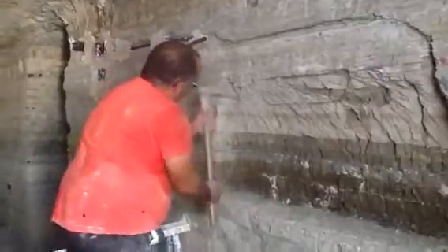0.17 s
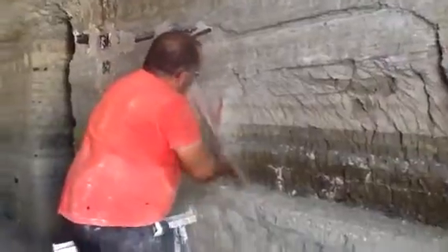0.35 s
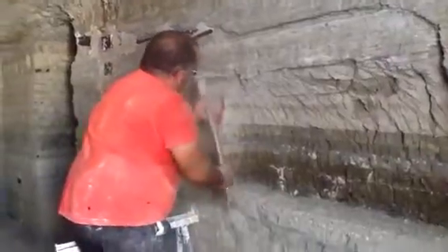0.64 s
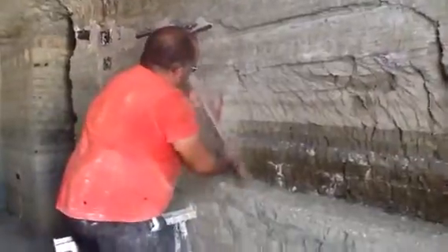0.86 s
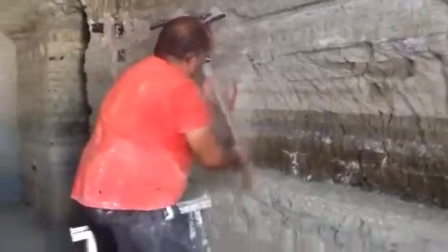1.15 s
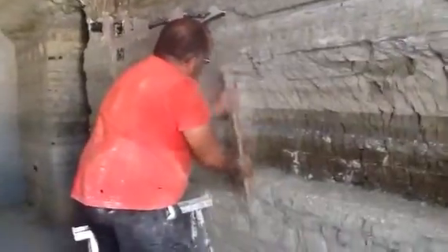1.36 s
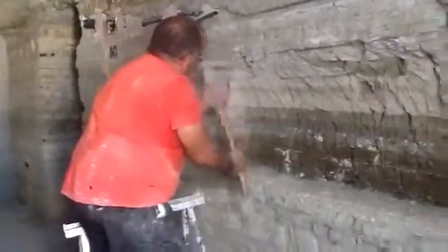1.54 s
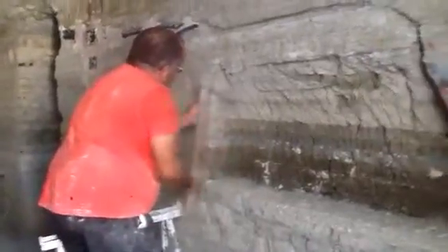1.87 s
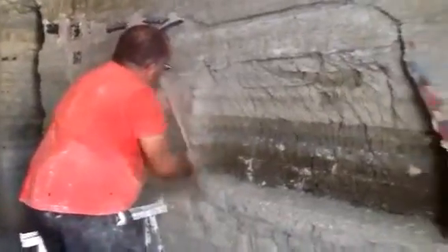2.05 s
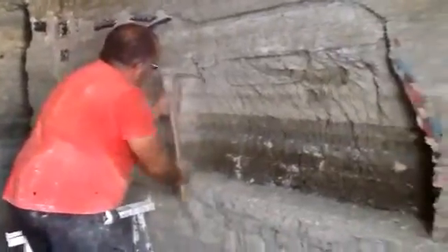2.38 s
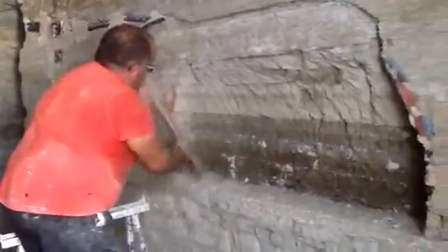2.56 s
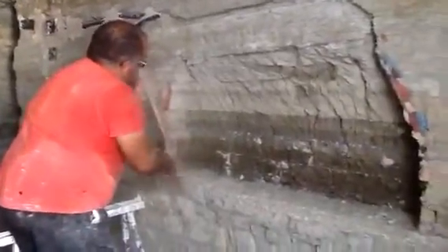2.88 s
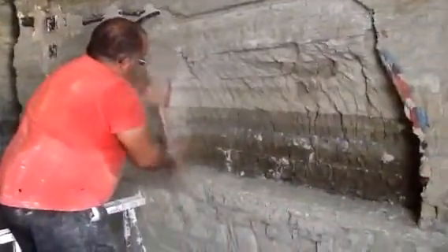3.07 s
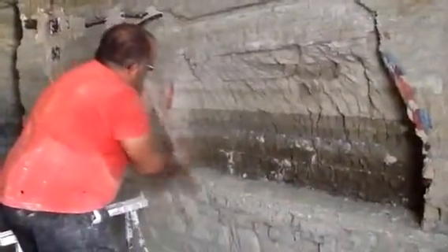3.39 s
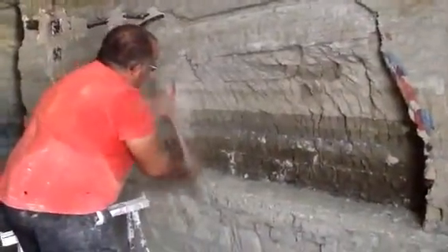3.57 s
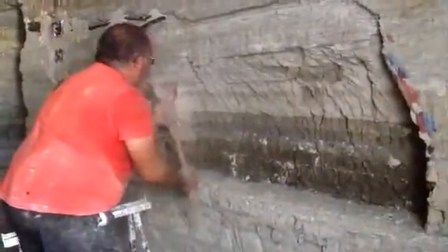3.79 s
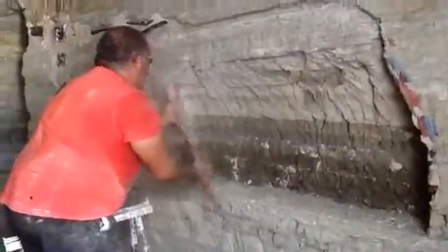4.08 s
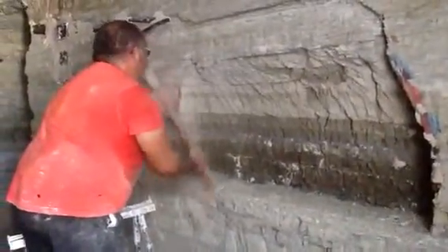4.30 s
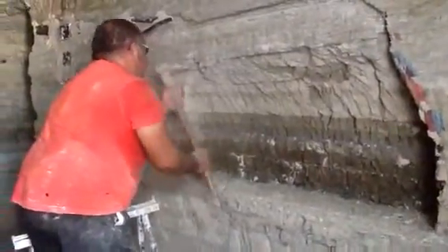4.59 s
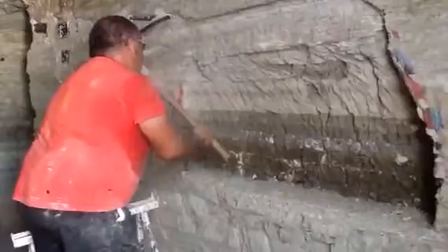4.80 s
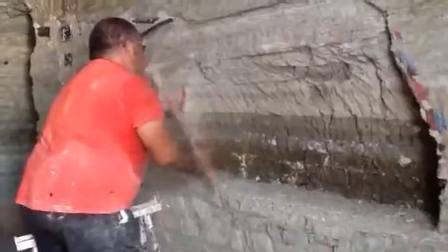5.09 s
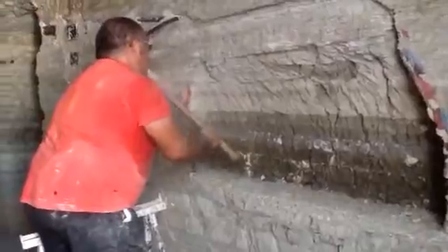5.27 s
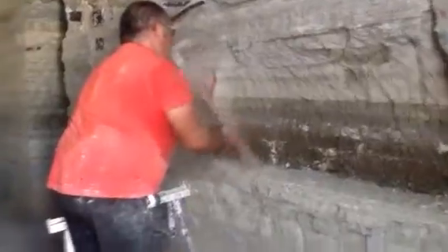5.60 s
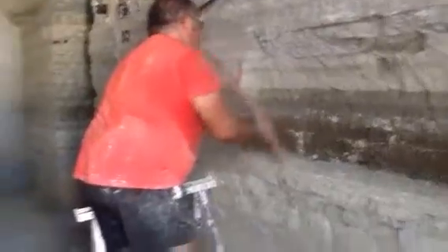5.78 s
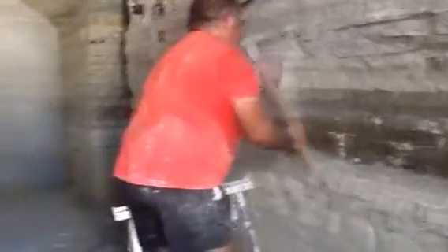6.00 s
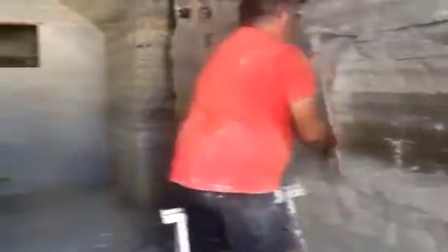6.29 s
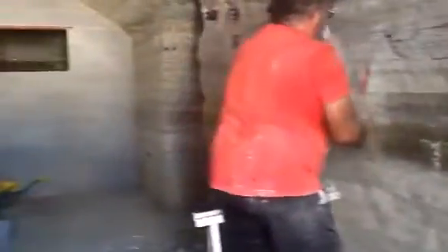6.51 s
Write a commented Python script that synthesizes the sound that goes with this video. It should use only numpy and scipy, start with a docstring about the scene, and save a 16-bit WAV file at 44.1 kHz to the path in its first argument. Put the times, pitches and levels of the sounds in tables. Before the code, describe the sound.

A brief rattle of stone opens, and a hand pick starts biting into a soft rock wall, a little over twice a second, continuing to the end at about 6.5 seconds. Each blow is a short, gritty crunch with a knock and a dull thud. Small chips clink and grit ticks between the blows. At about 1.9 seconds rubble slides along a steel blade, which rings out with a sharp, bright snap; a second ringing scrape follows near 2.9 seconds. A faint low rumble comes and goes behind the work, then swells from about 4.3 to 5.4 seconds as something heavy tumbles and makes the cave hum, along with more sliding rubble. Brighter clinks stand out near 5.1 and 5.9 seconds. Dust trickles as a quiet hiss throughout. The cave is small, with a short, dense echo, heard through a small microphone with little deep bass.

```python
"""A brief rattle of stone, then a hand pick biting into soft rock about twice a second in a small cave.
Each bite crushes the rock until it splits. Loosened chips clink, grit snaps and rubble slides, twice
along a steel blade that rings out. Behind the work dust trickles, and something heavy tumbles and wakes
the low modes of the cave. A small microphone with a bass cut hears the work with a short, dense echo."""
import sys
import numpy as np
from scipy import signal
from scipy.fft import rfft, irfft
from scipy.io import wavfile
from scipy.ndimage import uniform_filter1d

SR = 44100
rng = np.random.default_rng(int(sys.argv[2]) if len(sys.argv) > 2 else 0)


def generate_wav(signal):
    """Clip the signal to [-1, 1] and save it as 16-bit WAV at the path in sys.argv[1]."""
    frames = np.transpose(np.atleast_2d(signal))
    scaled = np.clip(frames, -1, 1) * 32767
    pcm = np.round(scaled).astype(np.int16)
    wavfile.write(sys.argv[1], SR, pcm)


N = 293265


def amp(db):
    return 10 ** (np.asarray(db) / 20)


def unit_rms(x):
    return x / np.sqrt(np.mean(x ** 2) + 1e-20)


def curve_at(points, hz):
    """Looks a value up on a log-frequency axis."""
    point_hz, value = np.transpose(points)
    return np.interp(np.log(hz + 1), np.log(point_hz + 1), value)


def add(mix, start_s, sound):
    part = mix[round(start_s * SR):][:len(sound)]
    part += sound[:len(part)]


def colour(x, spectrum, lo_hz=0, hi_hz=SR):
    """Shapes x by a spectrum normalised to its 800-3500 Hz power, then keeps one band."""
    hz = np.fft.rfftfreq(len(x), 1 / SR)
    gain = amp(curve_at(spectrum, hz))
    gain /= np.sqrt(np.mean(gain ** 2 * (hz > 800) * (hz < 3500)))
    band = 1 / (1 + (lo_hz / (hz + 1)) ** 6) / (1 + (hz / hi_hz) ** 6)
    return irfft(rfft(x) * gain * np.sqrt(band), len(x))


def ring(x, modes, chance_db=0):
    """Resonances (pitch_hz, width_hz, level_db), each driven harder or softer by chance."""
    out = np.zeros(len(x))
    for hz, width_hz, db in modes:
        radius = np.exp(-np.pi * width_hz / SR)
        pole = radius * np.exp(2j * np.pi * hz / SR)
        gain = amp(db + chance_db * rng.standard_normal())
        out += gain * signal.lfilter([np.sqrt(1 - radius)], [1, -pole], x).real
    return out


def grit(count, grain_db, grain_samples):
    """Noise in short grains of uneven strength."""
    strength = unit_rms(uniform_filter1d(rng.standard_normal(count), grain_samples))
    return unit_rms(rng.standard_normal(count) * amp(grain_db * strength))


# Spectrum of the dust on the wall, far in the background: freq_hz, level_db
DUST_SPECTRUM = [(30, -38), (75, -6), (108, -16), (152, 11.5), (362, 1.5), (611, -4.5), (2090, 3.5),
                 (3720, -6), (4840, 2), (7170, -5), (13500, -8), (15700, -15)]


def trickle(level_db=-59):
    """A quiet hiss that swells as dust and crumbs run down the wall."""
    swell_db = 3 * unit_rms(uniform_filter1d(rng.standard_normal(N), 3000))
    return amp(level_db + swell_db) * unit_rms(colour(grit(N, 1.5, 60), DUST_SPECTRUM))


# Spectrum of heavy pieces rolling: freq_hz, level_db
HEAVY_SPECTRUM = [(24, -65), (40, -39), (80, -26), (116, -61), (141, 15), (324, 13), (355, 11.5), (551, -2),
                  (622, 3), (1500, -12.5), (1950, -57)]
# Low modes of the cave around the microphone: pitch_hz, width_hz, level_db
CAVE_MODES = [(174.5, 2.4, 2.5), (194.6, 1.1, 7.5), (246.7, 4.6, 5.5), (294.1, 1.7, 4.5), (362.8, 4.2, 5.5),
              (457, 3.4, -10)]
# Heavy pieces tumbling behind the work: peak_s, swell_s, t60_s, rumble_db, lowest_modes_db
TUMBLES = [(0.0, 0.05, 0.38, -41, -75), (0.88, 0.076, 1.9, -44, -51.5), (1.43, 0.2, 1.05, -43, -49.5),
           (2.04, 0.12, 1.35, -50.5, -56.5), (2.77, 0.03, 0.77, -51, -61), (3.0, 0.11, 3.7, -66.5, -70),
           (3.203, 0.3, 0.83, -36.5, -38.5), (3.75, 0.66, 2.6, -53, -49.5), (4.27, 0.096, 0.37, -26.5, -42),
           (4.55, 0.093, 0.76, -23.5, -23.5), (4.63, 0.078, 0.86, -20.5, -33),
           (4.69, 0.043, 0.76, -30, -40), (4.779, 0.076, 0.17, -41, -27.5), (5.001, 0.17, 2.1, -29, -31.5),
           (5.13, 0.12, 0.77, -26.5, -33), (5.22, 0.031, 0.48, -30, -34), (5.3, 0.079, 0.93, -38, -32),
           (6.37, 0.038, 0.84, -45.5, -56.5)]


def rumble(lowest_hz=(135.5, 149.5), rest_db=(-74, -69.5)):
    """Tumbling pieces wake the modes of the cave; the two lowest beat against each other."""
    t = np.arange(N) / SR
    power = amp(rest_db)[:, None] ** 2  # one row for the rumble, one for the lowest modes
    for peak_s, swell_s, t60_s, *levels_db in TUMBLES:
        shape_db = np.where(t < peak_s, -28.5 * (peak_s - t) / swell_s, -60 * (t - peak_s) / t60_s)
        power = power + (amp(levels_db)[:, None] * amp(shape_db)) ** 2
    noise = grit(N, grain_db=1, grain_samples=400)
    boom = unit_rms(ring(noise, CAVE_MODES))
    roll = amp(-3) * unit_rms(colour(noise, HEAVY_SPECTRUM, 150, 1500))
    beating = sum(0.13 * unit_rms(ring(noise, [(hz, 7, 0)]))
                  + np.sin(2 * np.pi * (hz * t + rng.random())) for hz in lowest_hz)
    return (np.sqrt(power) * [unit_rms(boom + roll), unit_rms(beating)]).sum(0)


# Decay of the echo between the close walls: freq_hz, t60_s
ECHO_DECAY = [(150, 0.4), (500, 0.29), (2000, 0.32), (6000, 0.22), (14000, 0.35)]


def cave_echo(x):
    """Dense reflections of random sign, one in every 20 samples, each band dying at its own speed."""
    taps = np.zeros(SR // 2)
    slots = np.arange(200, len(taps) - 20, 20)
    taps[slots + rng.integers(0, 20, len(slots))] = rng.choice([-1., 1.], len(slots))
    hz, t, bands = signal.stft(taps, SR, nperseg=256)
    decay = amp(-60 * t / curve_at(ECHO_DECAY, hz)[:, None])
    tail = signal.istft(bands * decay, SR, nperseg=256)[1]
    return signal.fftconvolve(x, tail / np.linalg.norm(tail))[:N]


def crumbs(count):
    """Faint chips and ticks fall at random times around the work."""
    out = np.zeros(N)
    for chip_at, tick_at, size, pitch in rng.random((count, 4)):
        add(out, chip_at * N / SR, clink(-57 + 11 * size ** 2, 1700 * 3.5 ** pitch, .9, 200))
        add(out, tick_at * N / SR, tick(-52 + 10 * size, 4000 * 3 ** pitch))
    return out


# Grit snapping, high and dry: start_s, peak_db, pitch_hz
GRIT_TICKS = [(0.066, -34, 8300), (0.106, -35, 6000), (1.4336, -33, 5040), (1.4983, -33, 7260),
              (1.565, -40, 6850), (1.7776, -35.5, 8800), (1.91, -22, 9000), (1.936, -10, 10200),
              (2.192, -23.5, 8200), (2.5172, -41.5, 6200), (2.6374, -40, 6100), (2.883, -26, 5500),
              (3.451, -39.5, 6000), (4.464, -37, 6000), (4.6319, -25.5, 5200), (5.097, -41, 6000),
              (5.382, -43, 7000), (5.3183, -44, 8000), (5.024, -38, 9000), (6.1035, -50, 6550),
              (6.567, -46, 3500)]


def tick(peak_db, pitch_hz):
    """A grain snaps: a few milliseconds of bright noise around one broad resonance."""
    t = np.arange(SR // 20) / SR
    snap = rng.standard_normal(len(t)) * amp(-60 * t / .025) * (1 - np.exp(-t / .0007))
    snap = colour(snap, [(1500, -30), (0.61 * pitch_hz, -8), (pitch_hz, 0), (2.6 * pitch_hz, -12)])
    return amp(peak_db) * snap / abs(snap).max()


# Spectrum of loose stone on the cave floor: freq_hz, level_db
RUBBLE_SPECTRUM = [(180, -10), (300, -2), (454, -6.5), (1020, 1.5), (1230, -1), (1420, -3), (1800, -1),
                   (2160, -2), (3720, -21), (4540, -18.5), (12100, -22.5), (15700, -32)]
# Modes of the steel blade under the rubble: pitch_hz, width_hz, level_db
BLADE_MODES = [(1245, 45, 0), (1545, 30, -4), (1780, 60, -4), (2165, 50, 0), (2546, 60, -7), (4610, 70, -8),
               (5550, 50, -10), (6050, 45, -11), (6471, 37, -5), (9600, 100, -11), (11090, 60, -10)]
# Rubble sliding: start_s, swell_s, hold_s, level_db, fade_db_per_s, hiss_db, steel_db (both re level)
SLIDES = [(0.0, 0.0024, 0.036, -48, 119, -2.5, -2), (0.047, 0.022, 0.036, -43.5, 155, -0.5, -17),
          (1.809, 0.0068, 0.031, -49.5, 201, 10.5, 9.5), (1.838, 0.083, 0.027, -33.5, 109.5, 6.5, 7),
          (2.835, 0.071, 0.016, -40.5, 141, 8.5, 7), (2.956, 0.03, 0.03, -43.5, 175, 3, 3.5),
          (3.5, 0.065, 0.0055, -52.5, 75, 5.5, -40), (3.835, 0.0064, 0.01, -50.5, 60, 10, -57),
          (3.991, 0.021, 0.0058, -47, 202, 3.5, -40.5), (4.45, 0.063, 0.13, -36.5, 141, -10.5, -40),
          (4.94, 0.21, 0.025, -46, 111, -59, -34)]


def slide(swell_s, hold_s, level_db, fade_db_per_s, hiss_db, steel_db):
    """Gravel rushes along and keeps the steel ringing; the stones clink at scattered high pitches."""
    t = np.arange(0, swell_s + hold_s + 26.5 / fade_db_per_s, 1 / SR)  # ends 26.5 dB down
    fading_s = np.maximum(t - swell_s - hold_s, 0)
    envelope_db = level_db - 10 * np.maximum(1 - t / swell_s, 0) - fade_db_per_s * fading_s
    noise = grit(len(t), grain_db=3.5, grain_samples=90)
    # larger pieces wake now one mode of the blade, now another
    steel = unit_rms(sum(ring(grit(len(t), 4, 700), [mode], chance_db=1) for mode in BLADE_MODES))
    clink_hz = 4200 * 3 ** rng.random(18) ** 1.5
    clinks = sum(ring(grit(len(t), 6, 500), [(hz, 100, 0)]) for hz in clink_hz)
    body = colour(noise, RUBBLE_SPECTRUM, hi_hz=3700)
    hiss = unit_rms(colour(noise, RUBBLE_SPECTRUM, lo_hz=3700)) + .6 * unit_rms(clinks)
    hiss = unit_rms(colour(hiss, [(4000, 0), (15000, 0.2 * hiss_db)]))  # heavier rubble is duller
    hiss *= amp(hiss_db - 24 * fading_s)  # fades faster than the body
    return amp(envelope_db) * (body + amp(steel_db) * steel + hiss) * signal.windows.tukey(len(t), .08)


# Short ringing clinks: stone chips landing, and the steel blade ringing out during the two scrapes:
# start_s, level_db, pitch_hz, clack_share, roughness_hz
CLINKS = [(0.047, -30.5, 1860, 0.9, 400), (0.3554, -36, 3040, 0.3, 270), (0.356, -34.5, 7440, 0.5, 38),
          (0.486, -30, 3480, 0.56, 30), (0.722, -47, 2560, 0.1, 60), (0.81, -41, 980, 0.85, 310),
          (0.835, -29, 4830, 0.59, 320), (0.879, -41, 11100, 0.6, 35), (0.929, -33, 2100, 0.7, 200),
          (1.355, -39, 1980, 0.95, 300), (1.599, -38.5, 2690, 0.73, 240), (1.813, -32, 2130, 0.06, 410),
          (1.908, -18, 1250, 0.4, 40), (1.924, -23, 2150, 1, 36), (2.082, -27.5, 819, 0.44, 19),
          (2.074, -20.5, 1266, 0.17, 35), (2.19, -24, 3452, 0.34, 21), (2.583, -38.5, 1574, 0.28, 110),
          (2.598, -34, 1530, 0.14, 23), (2.853, -22, 1173, 0.1, 66), (2.9, -21, 1558, 0.28, 29),
          (3.416, -40.5, 1660, 0.86, 350), (3.4935, -37.5, 3480, 0.4, 14), (3.495, -30.5, 916, 0.8, 390),
          (3.557, -30, 2370, 0.6, 250), (3.807, -33.5, 860, 0.98, 380), (4.002, -32, 3350, 0.3, 53),
          (4.012, -29, 2670, 0, 90), (4.441, -35.5, 1050, 0.94, 290), (5.129, -22.5, 1247, 0.06, 370),
          (5.232, -41, 8800, 0.4, 200), (5.252, -34, 6360, 0.66, 300), (5.325, -34.5, 2270, 0.64, 120),
          (5.325, -38, 5400, 0.7, 150), (5.6979, -42.5, 3490, 0.47, 11), (5.948, -22.5, 4730, 0.57, 260),
          (6.137, -43, 2310, 0.45, 300), (6.193, -32, 11500, 0.26, 500), (6.281, -46, 1670, 0.9, 320)]


def clink(level_db, pitch_hz, clack_share, roughness_hz):
    """A tap on stone or steel: a clack of short rings around one longer tone, clear or roughened."""
    t = np.arange(SR // 3) / SR
    tap = rng.standard_normal(len(t)) * amp(-60 * t / 0.15) * (1 - np.exp(-t / .002))
    clack_hz = np.clip(pitch_hz * np.exp(0.247 * rng.standard_normal(9)), 300, 15000)
    clack = ring(tap, [(hz, 90 + .03 * hz, 0) for hz in clack_hz], chance_db=3)
    clack += 0.19 * colour(tap, RUBBLE_SPECTRUM, lo_hz=1800)
    blur_hz = pitch_hz + 90 + roughness_hz * rng.uniform(-1, 1, (4, 1))  # close partials blur the tone
    blur = min(.12 + roughness_hz / 300, .8) * np.sin(2 * np.pi * blur_hz * t).sum(0)
    tone = np.sin(2 * np.pi * pitch_hz * t) + blur
    t60_s = 0.11 + 4 / roughness_hz  # a clear tone lasts longer
    tone = tone / abs(tone[:900]).max() * amp(-60 * t / t60_s) * (1 - np.exp(-t / 0.0026))
    return amp(level_db) * ((1 - clack_share) * tone + clack_share * clack / abs(clack).max())


# Spectrum of soft rock being crushed: freq_hz, level_db
ROCK_SPECTRUM = [(100, 25), (404, 2.5), (885, -4), (1740, -2), (2290, 1.5), (2500, -1), (2830, -8),
                 (4060, -11), (5130, -3.5), (6890, -17), (14500, -19.5), (15700, -69)]
# Low modes of the struck wall: pitch_hz, width_hz, level_db
WALL_MODES = [(270, 78, -2), (374, 120, 1), (433, 23, -2)]
# Modes of the pick, ringing at every bite: pitch_hz, width_hz, level_db
PICK_MODES = [(1484, 140, -2), (2500, 74, -3.5), (3103, 51, -10.5), (4975, 46, -9), (6080, 87, -9)]
# Blows at the rock face, in the foreground: start_s, level_db, thud_db, grit_db (both re level),
# pitch_hz, crush_s, first_force (0-1), crack_db (re full force)
PICK_BLOWS = [(0.131, -38, 0, -9.5, 1700, 0.0082, 0.84, -1),
              (0.556, -40.5, -2, -13, 1770, 0.015, 0.98, -23),
              (0.970, -38.5, 0.5, -13.5, 1760, 0.025, 0.84, -3.5),
              (1.200, -41.5, -9, 1.5, 895, 0.0017, 1, -13),
              (1.387, -34.5, 0.5, -8.5, 1740, 0.018, 0.69, -18), (1.847, -31, -2, -36, 1150, 0.0018, 1, -9),
              (2.277, -35, 0, -12.5, 1610, 0.023, 0.48, -1), (2.721, -31, 3.5, -14, 1810, 0.018, 0.36, 0),
              (3.155, -33.5, -9, -7.5, 1770, 0.013, 1, -6), (3.644, -36.5, -5, -18.5, 1930, 0.01, 1, 1),
              (4.114, -33.5, 1, -16, 1460, 0.016, 0.72, -12), (4.233, -36, 10, -10.5, 1130, 0.019, 0.67, 0),
              (4.552, -40.5, 7.5, -10, 2400, 0.0051, 0.7, 5), (4.981, -44, 2, -9.5, 1640, 0.011, 0.4, 3.5),
              (5.411, -40.5, 0, -14, 1580, 0.011, 1, 3), (5.845, -34, -3.5, -18, 1730, 0.015, 0.75, 1),
              (6.328, -38.5, -2, -3, 1550, 0.0041, 1, -15)]


def pick_blow(level_db, thud_db, grit_db, pitch_hz, crush_s, first_force, crack_db):
    """The point crushes rock with growing force until it stops and splits it; pick and wall ring."""
    t = np.arange(SR // 3) / SR
    split, from_split_s = t >= crush_s, abs(t - crush_s)
    pressing = first_force + (1 - first_force) * (t / crush_s) ** 6
    release = amp(-60 * from_split_s / 0.2) + amp(crack_db) * np.exp(-from_split_s / .0075)
    force = np.where(split, release, pressing) * (1 - np.exp(-t / .003))  # soft rock yields at first
    snap = amp(crack_db + 9) * split * np.exp(-from_split_s / .0001)  # one hard pulse starts the crack
    noise = grit(len(t), grain_db=2.5, grain_samples=70)
    crushing = noise * force
    crunch = colour(noise, ROCK_SPECTRUM, 650, 3700) * force
    flake_modes = [(hz, 130, 0) for hz in 4200 * 2.6 ** rng.random(8) ** 1.5]
    fine_grit = unit_rms(colour(noise, ROCK_SPECTRUM, lo_hz=3700)) * force
    fine_grit += .3 * ring(crushing, flake_modes, chance_db=3)
    knock = ring(crushing + snap, [(pitch_hz, 150, 3)])
    knock += amp(-3) * ring(crushing + snap, PICK_MODES, chance_db=3)
    wall = unit_rms(colour(noise, ROCK_SPECTRUM, 263, 540)) + 1.3 * unit_rms(ring(noise, WALL_MODES))
    thud = unit_rms(wall) * (1 - np.exp(-t / 0.0018)) * amp(thud_db - 60 * t / 0.41)
    # the thud swells fully once the rock splits
    thud *= np.where(split, 1 - (1 - first_force ** 2) * np.exp(-from_split_s / 0.003), first_force ** 2)
    thud += amp(thud_db + 3.5) * ring(snap, WALL_MODES)
    return amp(level_db) * (amp(-1.5) * crunch + amp(grit_db) * fine_grit + amp(-0.5) * knock + thud)


def scene():
    """The work at the rock face, direct and echoed, over rumble and trickle; mono."""
    work = crumbs(count=50)
    sources = (PICK_BLOWS, pick_blow), (CLINKS, clink), (GRIT_TICKS, tick), (SLIDES, slide)
    for table, sound in sources:
        for start_s, *row in table:
            add(work, start_s, sound(*row))
    return (work + amp(-6.5) * cave_echo(work) + rumble() + trickle())[None]


def record(dry):
    """The microphone cuts bass steeply but not fully; its amplifier rounds peaks and skews low notes."""
    bass_cut_hz, top_hz, ceiling = 124, 15550, .45
    bass_cut = signal.cheby1(6, .5, bass_cut_hz, "high", fs=SR, output="sos")
    mic = signal.sosfilt(bass_cut, dry) + amp(-20) * dry
    bass = signal.sosfilt(signal.butter(2, 500, fs=SR, output="sos"), mic)
    lopsided = 0.4 * signal.sosfilt(signal.butter(1, 25, "high", fs=SR, output="sos"), bass ** 2)
    amplified = ceiling * np.tanh(mic / ceiling) + lopsided
    band_limit = signal.firwin(511, top_hz, window=("kaiser", 9), fs=SR)
    return signal.oaconvolve(amplified, band_limit[None], "same")


dry = scene()
out = record(dry)
generate_wav(out)
```